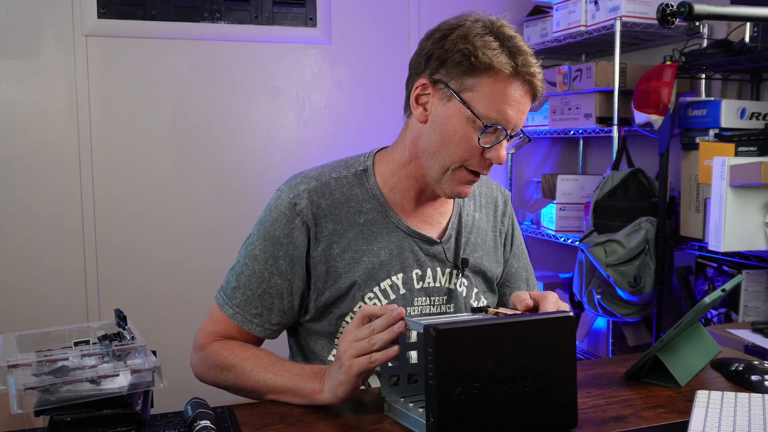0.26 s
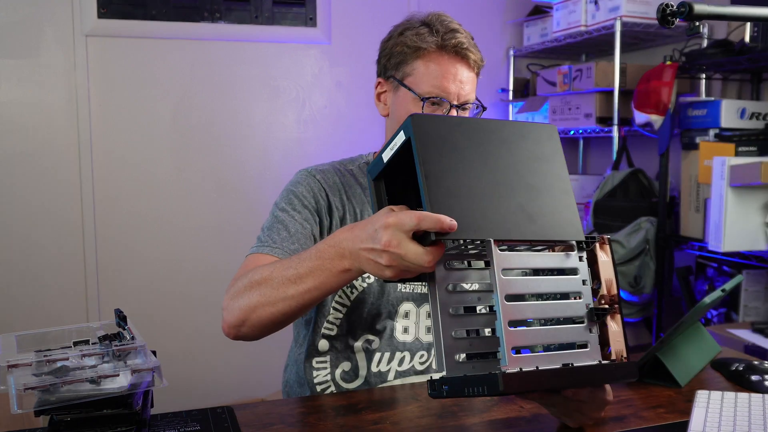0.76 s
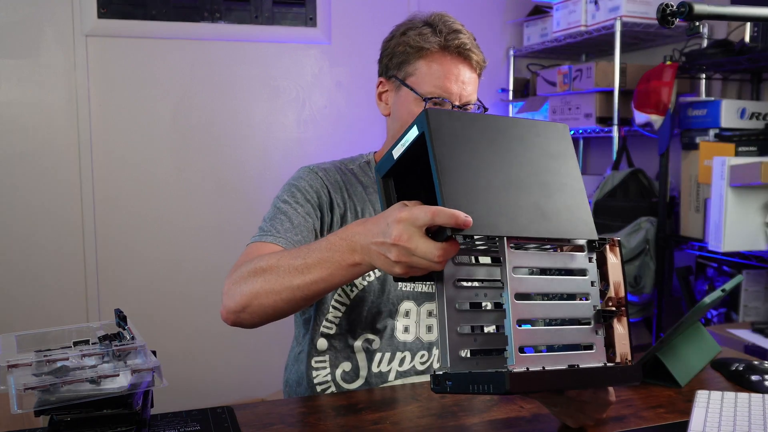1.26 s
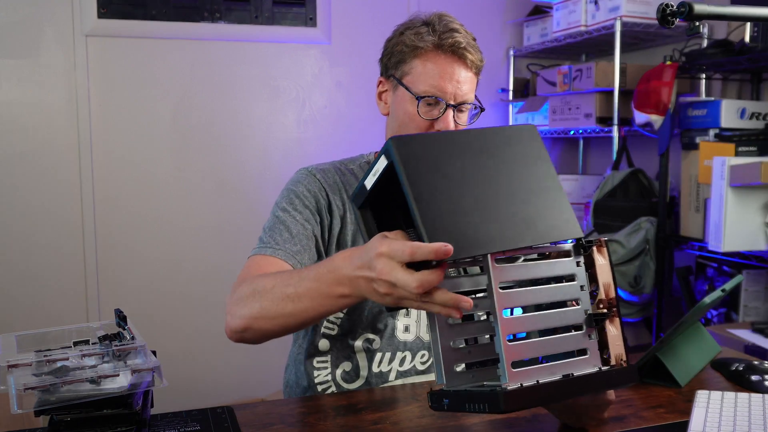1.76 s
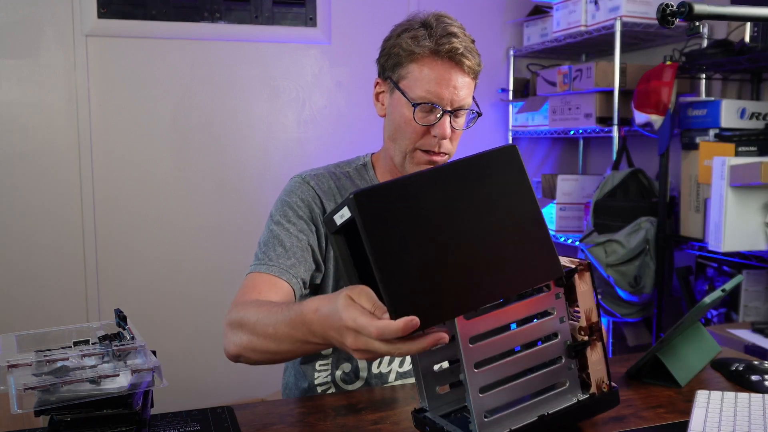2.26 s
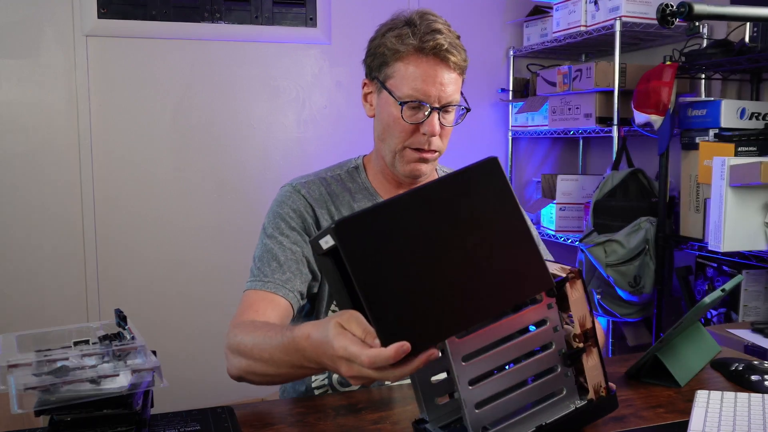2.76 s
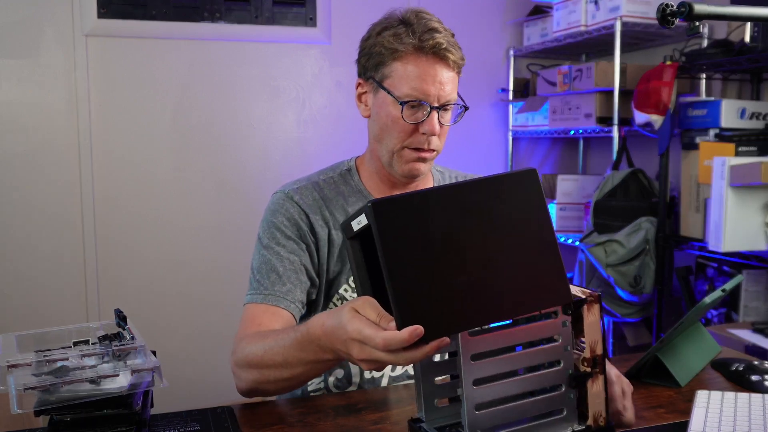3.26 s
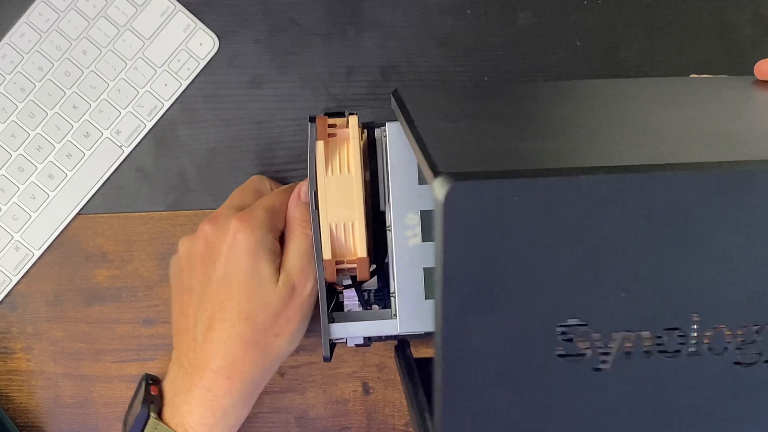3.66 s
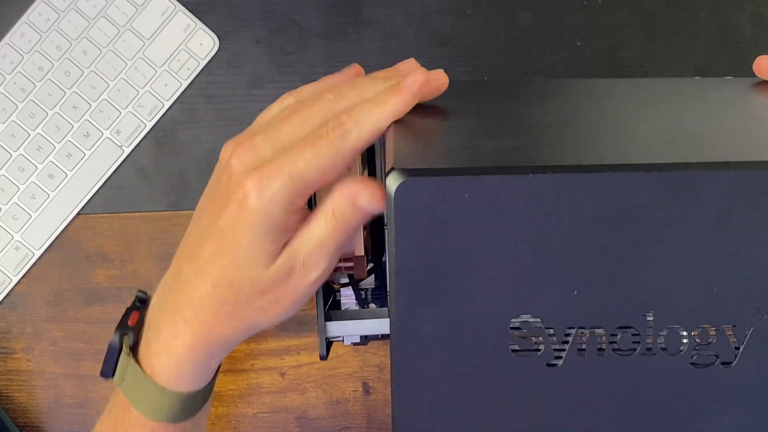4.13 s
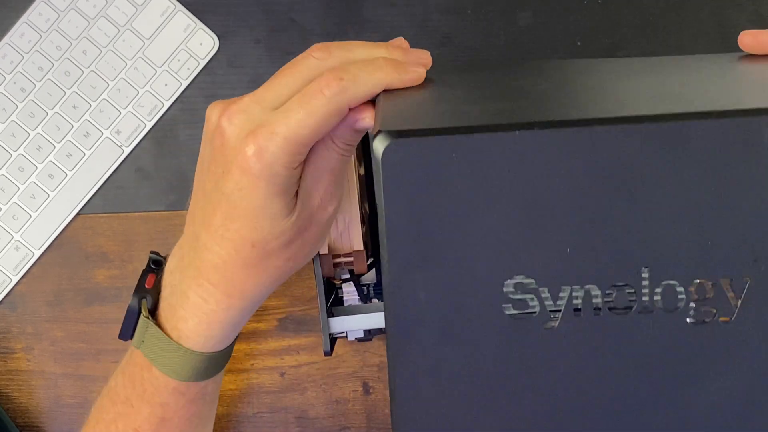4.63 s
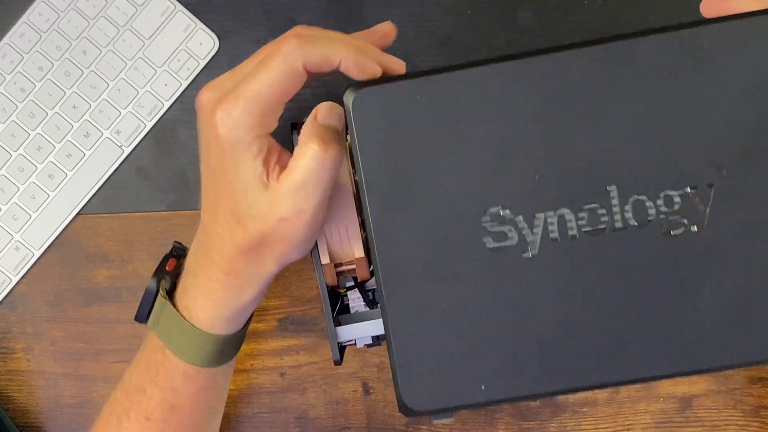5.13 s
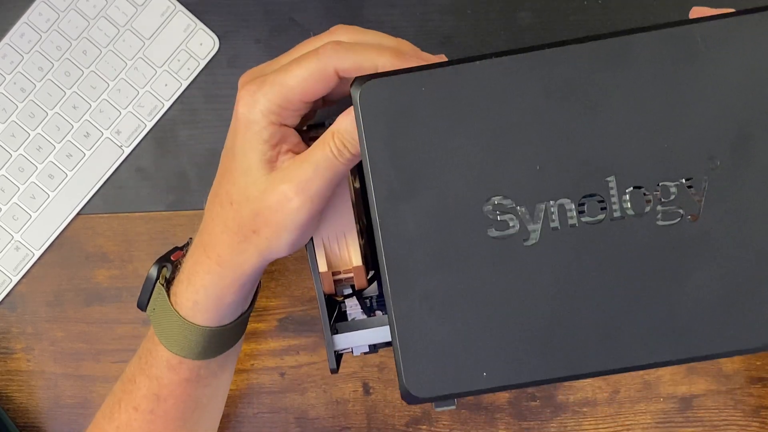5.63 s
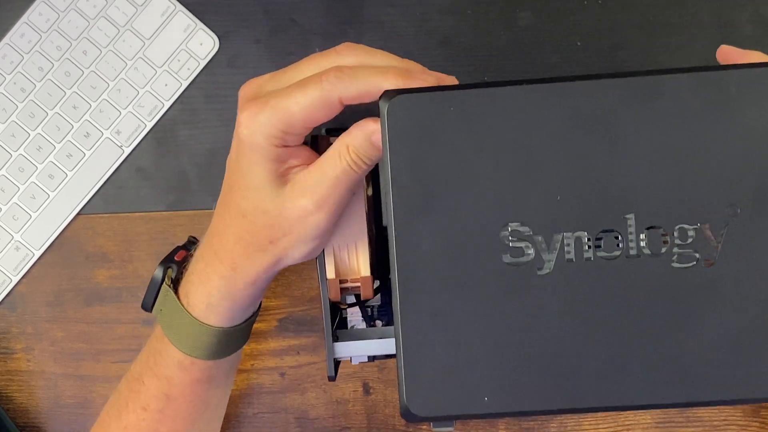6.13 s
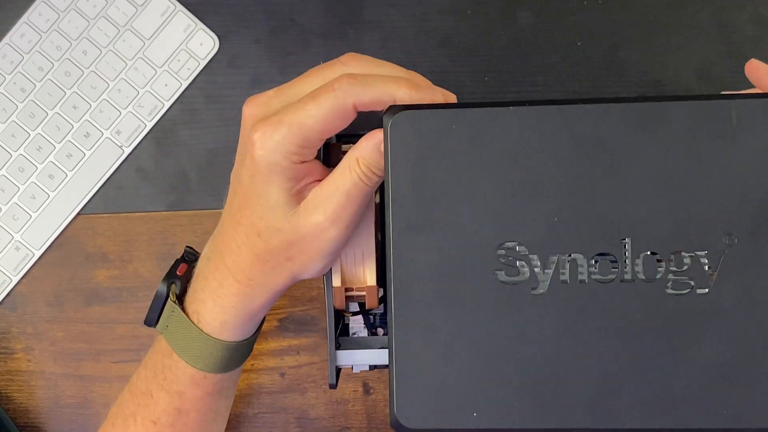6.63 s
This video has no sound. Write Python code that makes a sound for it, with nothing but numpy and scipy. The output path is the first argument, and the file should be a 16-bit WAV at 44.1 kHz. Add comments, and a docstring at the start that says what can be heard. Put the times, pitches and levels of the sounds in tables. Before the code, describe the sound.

A close stereo microphone in a small, quiet room with faint low air noise and short echo. Almost nothing at first, only a light tick and scuff around 0.2 s. At 0.45 s a thin metal cover knocks hard on a frame, cracking and buzzing, with rattles and dry snaps until about 1.1 s, then weaker taps to 1.4 s. A brief scrape comes at 1.6 s. From 1.7 to 3.3 s it is mostly quiet chafing, a very faint high squeak near 2.15 s, a snap and dull desk thump at 2.5 s, and short scrapes around 2.7 to 3.3 s. Sharp clacks hit at 3.43 and 3.65 s. After soft rubbing and a scrape at 4.3 s, bright clattering knocks come at 4.65 to 4.7 s, then a harsh, dense scraping burst with snaps at 4.95 to 5.3 s. Small scuffs and ticks trail off to 6.9 s.

```python
"""On a wooden desk in a small room, a sheet-metal cover is worked onto the frame of a small device.
First its edge knocks and rattles on top of the frame, and the frame is dragged round on the desk;
then the cover is pushed along its rails, scraping, catching and chattering in bursts.
Each knock is a crack and a dying buzz, each scrape is a run of tiny random catches; both set the metal ringing.
Short snaps, stray light ticks and one faint squeak join in, over the quiet air of the room."""
import sys
import numpy as np
from scipy import signal
from scipy.fft import rfft, irfft, next_fast_len
from scipy.io import wavfile

SR = 44100
rng = np.random.default_rng(int(sys.argv[2]) if len(sys.argv) > 2 else 0)


def pcm_store(signal):
    """Save signal as 16-bit PCM."""
    levels = np.round(np.clip(np.atleast_2d(signal), -1, 1) * 32767)
    wavfile.write(sys.argv[1], SR, levels.astype(np.int16).T)


N = 304103   # length in samples
CUTOFF_HZ = 15700   # top of the sound
ON_DESK_S, SEATED_S = 1.7, 3.4   # when the frame is tipped on the desk, and when the cover meets its rails


def from_db(db):
    """Turn decibels into a factor."""
    return 10 ** (np.asarray(db) / 20)


def rms(x):
    """Average strength of a sound."""
    return np.sqrt(np.mean(x ** 2) + 1e-24)


def at_hz(points, hz):
    """Read a table between its points, on a log-frequency axis."""
    points = np.array(points)
    return np.interp(np.log(np.maximum(hz, 1)), np.log(points[:, 0]), points[:, 1])


def band(x, low, high, order=3):
    """Keep only the sound between two frequencies."""
    return signal.sosfilt(signal.butter(order, [low, high], "band", fs=SR, output="sos"), x)


def dying(t, t60):
    """Fade that drops by 60 dB in t60 seconds."""
    return np.exp(-np.log(1000) * t / max(t60, 1e-3))


def add(out, s, sound):
    """Mix a sound in at time s."""
    start = max(round(s * SR), 0)
    out[start:start + len(sound)] += sound[:N - start]


def wander(per_s, t):
    """Random curve around 0, with a typical size of 1, that heads for a new value per_s times a second."""
    knots = rng.standard_normal(len(t))
    return np.interp(t * per_s, np.arange(len(knots)), knots)


def coloured(x, spectrum, size=4096):
    """Filter with the given spectrum, answering as early as it can (causal, minimum-phase)."""
    level_db = at_hz(spectrum, np.arange(size // 2 + 1) * SR / size)
    cepstrum = irfft(np.log(from_db(level_db)))
    # folding the later half onto the earlier one makes the filter minimum-phase
    cepstrum[1:size // 2] *= 2
    cepstrum[size // 2 + 1:] = 0
    response = irfft(np.exp(rfft(cepstrum)))
    return signal.fftconvolve(x, response)[:len(x)]


# colour of the still room: pitch_hz, level_db (per Hz, relative)
AIR_COLOUR = [(15, -43), (25, -10.5), (206, -7), (242, 1.5), (277, -18.5), (416, -1.5), (531, -22),
              (1400, -17), (1700, -18), (3250, -31), (16000, -35)]
AIR_DB = -72


def still_air():
    """The quiet room is steady noise with a fixed colour."""
    air = coloured(rng.standard_normal(N), AIR_COLOUR)
    return from_db(AIR_DB) * air / rms(air)


# how long the room's echo takes to fall by 60 dB: pitch_hz, t60_s
ROOM_T60 = [(80, 1), (300, 0.19), (1000, 0.51), (3000, 0.21), (7000, 0.15), (14000, 0.15)]


def room(x, wet_db, gap_s=0.0066):
    """A diffuse tail fades at its own pace in each band; the channels differ more towards the treble."""
    t = np.arange(int(.7 * SR)) / SR
    edges = np.geomspace(90, 16000, 10)
    echo = 0
    for low, high in zip(edges, edges[1:]):
        hz = np.sqrt(low * high)
        mid, side = band(rng.standard_normal((2, len(t))), low, high, order=2)
        build_up = 1 - np.exp(-(t / gap_s) ** 2)
        fade = dying(t, at_hz(ROOM_T60, hz)) * build_up
        width = min((hz / 9000) ** 2, 1)
        stereo = mid + width * side * np.array([[1], [-1]])
        echo = echo + stereo * fade / np.sqrt(np.sum(fade ** 2) * (1 + width ** 2))
    return from_db(wet_db) * signal.fftconvolve(x[None], echo, axes=1)[:, :N]


def sideways(x, above_hz=4400, side_db=-8.0):
    """Short waves leave the shaking sheet differently to left and right from moment to moment."""
    side = band(x * wander(740, np.arange(N) / SR), above_hz, CUTOFF_HZ, order=2)
    return from_db(side_db) * side * np.array([[1], [-1]])


# ringing tones (modes) of the cover held loose above the frame: pitch_hz, level_db (relative), t60_s
LOOSE_MODES = [(174.5, 9.5, 0.22), (325, 11.5, 0.18), (336, 0.5, 0.17), (410, -22, 0.29), (520.5, -9, 0.32),
               (528, 7.5, 0.72), (1382, 2, 0.053), (1315, 2.5, 0.024), (1500, 8.5, 0.15),
               (1930, -4.5, 0.26), (2084, 7, 0.032), (2650, 4, 0.103), (2860, 6.5, 0.051), (3470, 1, 0.077),
               (4680, -10, 0.13), (4950, 2, 0.041)]
# modes of the frame tilted and dragged on the desk: pitch_hz, level_db (relative), t60_s
FRAME_MODES = [(131.3, -4, 0.5), (214.3, 5, 0.44), (430, 7.5, 0.12), (602, -26, 0.29), (716, 8.5, 0.24),
               (1155, 14, 0.013), (1273, 15, 0.048), (1560, 13, 0.039), (2270, 8, 0.0057),
               (4100, -7, 0.076)]
# modes of the cover once it sits on the rails: pitch_hz, level_db (relative), t60_s
SEATED_MODES = [(76.5, 7, 0.62), (209.3, 5.9, 0.4), (237, 0.7, 0.37), (315, 2.4, 0.24), (435.7, 4.3, 0.057),
                (468, 2.6, 0.08), (527.6, 4.8, 0.031), (571, 4, 0.032), (644, 4.2, 0.033),
                (704, 7.6, 0.083), (952, 6.2, 0.053), (1041, 4.8, 0.056), (1335, 7.7, 0.11),
                (1538, 1.8, 0.086), (1542, 6.2, 0.25), (1691, 2.8, 0.069), (2510, 4.1, 0.056),
                (2860, 3.1, 0.027), (2853, 3.2, 0.067), (3370, 4, 0.25), (5220, 4.2, 0.034),
                (5770, 5.8, 0.08)]
# colour of blows on the loose cover: pitch_hz, level_db (per Hz, relative)
LOOSE_COLOUR = [(50, -35), (100, -19), (165, -8.5), (240, -10), (350, -4.5), (520, 3.5), (680, -7),
                (900, -15), (1350, -6.5), (2100, -10), (3400, -15.5), (4300, -22.5), (7000, -33.5),
                (11000, -40), (15500, -50)]
# colour of blows of the cover against the frame: pitch_hz, level_db (per Hz, relative)
BLOW_COLOUR = [(35, -16.5), (75, -11.5), (130, -7), (210, -5), (290, -5), (480, 4.5), (680, -2.5),
               (850, -8.5), (1500, -2.5), (2300, -5.5), (3250, -5.5), (4100, -15), (8000, -22.5),
               (11000, -30.5), (15500, -38)]


def body_at(s):
    """The modes and the colour of blows depend on how the parts are held: loose, tilted on the desk, seated."""
    if s < ON_DESK_S:
        return LOOSE_MODES, LOOSE_COLOUR
    return FRAME_MODES if s < SEATED_S else SEATED_MODES, BLOW_COLOUR


def ringing_metal(x, modes, ring_db):
    """The metal passes each vibration on and rings with it at its own modes."""
    out = x.copy()
    for hz, db, t60 in modes:
        r = dying(1 / SR, t60)   # what is left of the ring after one sample
        poles = [1, -2 * r * np.cos(2 * np.pi * hz / SR), r * r]
        zeros = [(1 - r * r) / 2, 0, (r * r - 1) / 2]
        out += from_db(db + ring_db) * signal.lfilter(zeros, poles, x)
    return out


def unevenness(spread_db, step_hz=170):
    """Every point of contact favours its own share of the sheet's crowded upper modes (Hz, dB)."""
    hz = np.arange(30, SR / 2, step_hz)
    level_db = spread_db * rng.standard_normal(len(hz)) * np.minimum(hz / 1100, 1)
    return np.column_stack([hz, level_db])


def travelling(force, t, spot_s=0.069):
    """As the point of contact moves on, one uneven colour fades into the next."""
    out = 0
    for s in np.arange(0, t[-1] + spot_s, spot_s):
        nearness = np.sqrt(np.maximum(1 - np.abs(t - s) / spot_s, 0))
        out = out + coloured(force * nearness, unevenness(3.0))
    return out


# four bands, for thump, panel, clang or rasp, tick or hiss: low_hz, high_hz
ZONES = [(35, 250), (250, 900), (900, 4000), (4000, 15800)]
# colour of the force between sliding parts: pitch_hz, level_db (per Hz, relative)
RUB_COLOUR = [(24, -24), (40, -11), (215, -8.5), (276, -6.5), (585, -5), (831, -11.5), (1090, -12.5),
              (1210, -17.5), (1520, -12.5), (4800, -20), (11600, -35.5), (14500, -39.5), (16000, -62)]
# share of each band in friction, desk rumble first: level_db at hardness 0, change_db per dB of hardness
RUB_SHARES = [(-12, 0.17), (0, -0.52), (-4, 0.68), (-15.5, 1.0)]


def friction(s, t, hardness_db, grain_db, judder_db, ring_db):
    """Tiny catches of the rubbing edges, in uneven clumps, drive the metal; the desk rumbles along."""
    grain = from_db(grain_db * np.minimum(rng.exponential(1, len(t)), 5))
    judder = from_db(judder_db * wander(150, t))
    catches = rng.standard_normal(len(t)) * grain * judder
    force = travelling(coloured(catches, RUB_COLOUR), t)
    modes, _ = body_at(s)
    rub = ringing_metal(force, modes, ring_db)
    out = 0
    for (low, high), (db, slope) in zip(ZONES, RUB_SHARES):
        part = band(rub, low, high)
        out = out + from_db(db + slope * hardness_db) * part / rms(part)
    return out


# faint chafing while the hands hold cover and frame together: time_s, level_db (before the trim below)
CHAFE = [(0, -82), (.43, -86), (.55, -56), (.97, -53.5), (1.25, -60), (1.52, -70), (1.8, -65),
         (2.03, -66.5), (2.42, -76.5), (2.7, -63.5), (3.7, -58), (4.0, -67.5), (4.5, -62), (4.72, -46.5),
         (4.9, -60), (5.25, -38.5), (5.42, -66.5), (6.3, -62), (6.74, -74), (6.9, -59.5)]
CHAFE_TRIM_DB, CHAFE_HARDNESS_DB = 0.5, -1.0


def chafing(fidget_db=2.0, fidget_per_s=25):
    """Between the pushes the parts never lie quite still, whether loose, tilted or seated."""
    out = np.zeros(N)
    changes = [0, ON_DESK_S, SEATED_S, N / SR]
    for start, end in zip(changes, changes[1:]):
        t = np.arange(int((end - start) * SR)) / SR
        held_db = CHAFE_TRIM_DB + np.interp(start + t, *np.transpose(CHAFE))
        level_db = held_db + fidget_db * wander(fidget_per_s, t)
        rub = friction(start, t, CHAFE_HARDNESS_DB, grain_db=3.5, judder_db=3.0, ring_db=-9.5)
        add(out, start, from_db(level_db) * rub)
    return out


RING_DB = -4.5   # ring of the metal after a blow
KNOCK_RISE_S = 0.0009   # the sheet takes this long to start buzzing
# a harder contact moves the sound from panel to clang and tick: (dB at hardness 0, dB per dB of hardness)
KNOCK_PANEL, KNOCK_CLANG, KNOCK_TICK = (-1.75, -0.28), (-5, 0.34), (-18.5, 1.0)


def blow(s, strength_db, hardness_db, thump_db, t60, thump_trim_db=-4.0,
         linger=(1.1, 1.15, 1.1, 1.1), crack=5.0, buzz_db=1.5):
    """A contact is a crack and a dying buzz of sheet on sheet; hardness sets the share of panel, clang and tick."""
    t = np.arange(SR // 3) / SR
    attack = t < .025   # each band is levelled over these first moments
    modes, colour = body_at(s)
    rise = 1 - np.exp(-t / KNOCK_RISE_S)
    buzz = rng.standard_normal(len(t)) * from_db(buzz_db * wander(903, t)) * rise
    buzz[0] = crack
    force = coloured(coloured(buzz, colour), unevenness(3.8))
    shares = [thump_db + thump_trim_db]
    shares += [db + slope * hardness_db for db, slope in (KNOCK_PANEL, KNOCK_CLANG, KNOCK_TICK)]
    out = 0
    for (low, high), db, stretch in zip(ZONES, shares, linger):
        part = band(ringing_metal(force * dying(t, t60 * stretch), modes, RING_DB), low, high)
        out = out + from_db(strength_db + db) * part / rms(part[attack])
    return out


TICKS_PER_S, TICK_OVER_CHAFE_DB, TICK_HARDNESS_DB = 7, -0.5, 2
TICK_THUMP_DB, TICK_T60_S = -12.0, 0.035   # as in a blow, before its trim and stretch


def ticks(spread_db=4.0):
    """Edges touch lightly at random, harder where the parts chafe more."""
    out = np.zeros(N)
    waits_s = rng.uniform(.2, 1.8, size=120) / TICKS_PER_S
    for s, luck in zip(np.cumsum(waits_s), rng.standard_normal(len(waits_s))):
        if s < N / SR:
            db = np.interp(s, *np.transpose(CHAFE)) + TICK_OVER_CHAFE_DB + spread_db * luck
            add(out, s, blow(s, db, TICK_HARDNESS_DB, TICK_THUMP_DB, TICK_T60_S))
    return out


STROKE_ARCH = 0.75   # loudness is this power of the speed


def arch(t):
    """Loudness of one push: it speeds up and slows down as a half sine."""
    return np.abs(np.sin(np.pi * t / t[-1])) ** STROKE_ARCH


SQUEAK_S, SQUEAK_LENGTH_S = 2.13, 0.123
SQUEAK_HZ, SQUEAK_WIDTH_HZ, SQUEAK_DB = 3890, 160, -69   # level before the arch


def squeak():
    """One edge squeaks faintly as it slides: a narrow, unsteady tone under the arch of a push."""
    out = np.zeros(N)
    t = np.arange(int(SQUEAK_LENGTH_S * SR)) / SR
    low, high = SQUEAK_HZ - SQUEAK_WIDTH_HZ / 2, SQUEAK_HZ + SQUEAK_WIDTH_HZ / 2
    tone = band(rng.standard_normal(len(t)), low, high, order=2)
    add(out, SQUEAK_S, from_db(SQUEAK_DB) * arch(t) * tone / rms(tone))
    return out


# pushes that make an edge slide: start_s, length_s, level_db (before arch and shares), hardness_db
STROKES = [(0.242, .1, -63, 6), (0.54, 0.11, -52, 4.5), (1.58, 0.071, -50, 3.5), (1.921, 0.095, -62, 5.5),
           (2.089, 0.17, -64, 8), (2.698, 0.067, -53, 3.5), (2.759, 0.33, -52, 5), (3.13, 0.079, -62.5, 15),
           (3.191, .14, -47.5, 5.5), (3.414, 0.02, -50, 9), (3.761, 0.14, -69, 15), (4.27, .13, -53, 3.5),
           (4.551, 0.21, -52, 4), (4.82, 0.1, -55.5, -0.5), (4.968, 0.21, -49.5, 16),
           (5.052, 0.021, -42, 14.5), (5.08, 0.17, -39, 4.5), (5.444, 0.037, -57, 2),
           (5.826, 0.21, -74.5, 18), (6.04, .07, -63.5, 2.5), (6.16, 0.067, -53, 2.5),
           (6.248, 0.13, -58, 5), (6.428, 0.088, -52.5, 1.5), (6.61, 0.07, -57, -1),
           (6.797, 0.088, -64.5, 13)]


def strokes():
    """Each push swells and fades as the edge gathers speed and stops."""
    out = np.zeros(N)
    for s, length_s, db, hardness_db in STROKES:
        t = np.arange(int(length_s * SR)) / SR
        rub = friction(s, t, hardness_db, grain_db=3.0, judder_db=2.5, ring_db=-6.5)
        add(out, s, from_db(db) * arch(t) * rub)
    return out


# hard, clean snaps of an edge: start_s, peak_db, pitch_hz (middle of five tones), t60_s
SNAPS = [(0.8035, -19, 2600, .03), (1.004, -23, 430, .02), (1.0312, -16, 440, .015),
         (2.4935, -22, 1500, .014), (3.4292, -14, 3300, .014), (3.959, -42, 1500, .012),
         (4.158, -45, 5000, .012), (5.0745, -17, 3000, .015), (5.2165, -20, 520, .02),
         (6.324, -32, 750, .03)]


def snaps(spread=0.339):
    """An edge that slips off a ledge gives a pulse a few milliseconds long, with its bass cut."""
    out = np.zeros(N)
    t = np.arange(SR // 20) / SR
    for s, db, hz, t60 in SNAPS:
        partials = hz * np.exp(spread * np.linspace(-1, 1, 5))
        tones = sum(np.sin(2 * np.pi * (f * t + rng.random())) for f in partials)
        pulse = band(dying(t, t60) * tones, hz / 2, min(hz * 4, CUTOFF_HZ), order=2)
        add(out, s, from_db(db) * pulse / np.abs(pulse).max())
    return out


# contacts of cover, frame and desk, before the shares, trim and stretch in blow:
# start_s, strength_db, hardness_db, thump_db (of the desk, over the strength), t60_s (of the ring)
KNOCKS = [(0.2277, -53.5, 12.5, -10, 0.041), (0.454, -27.5, -3, -9.5, 0.13),
          (0.4565, -25.5, 2.5, -20, 0.16), (0.4987, -30, -8, -5, 0.055), (0.5075, -29.5, 2, -31, 0.099),
          (0.5393, -33.5, -4.5, -28.5, 0.03), (0.5686, -36, 1.5, -23.5, 0.043),
          (0.685, -40.5, -2, -32, 0.058), (0.7715, -36.5, -1.5, -5, 0.073), (0.8032, -27.5, 7.5, -21, 0.13),
          (0.8818, -42, -1, -30, 0.057), (0.9451, -44.5, 4.5, -27, 0.066), (1.0029, -33, -11, -5, .1),
          (1.0087, -33.5, 8, -12, 0.11), (1.0304, -35.5, 2.5, -15, 0.12), (1.08, -36.5, -1, -13, 0.046),
          (1.1543, -48, -4, -19, .13), (1.32, -41, 4, -10.5, 0.16), (1.383, -40, 4, -19, 0.14),
          (1.6051, -50.5, 4, -12, 0.12), (1.8045, -51.5, 4, -2, 0.038), (2.4924, -37.5, -6, 5, 0.06),
          (2.5204, -45, -6.5, 6, 0.3), (2.9396, -52.5, -22, 10.5, .2), (2.9729, -42.5, 2.5, -20, .07),
          (3.267, -55.5, -10, 10.5, 0.2), (3.3441, -54, -5, 8.5, 0.087), (3.4268, -30, 5, 3, 0.08),
          (3.4407, -27.5, 0, 3.5, .19), (3.4613, -33.5, -0.5, -6, .22), (3.639, -28.5, -3.5, -3.5, .12),
          (3.65, -25.5, 2.5, -30, 0.092), (3.6821, -24, -0.5, -15, 0.066), (3.6903, -29.5, 5, -37, 0.11),
          (4.0539, -53.5, -1, -4.5, 0.045), (4.4649, -49, -13.5, -1.5, 0.047), (4.5407, -46, -2, -9, .14),
          (4.6505, -25.5, 6, -19, 0.094), (4.6743, -29.5, -0.5, -17, 0.17), (4.7, -24.5, 4.5, -8, 0.085),
          (4.8054, -50, 2, -9, 0.058), (4.91, -44.5, -6, -10, 0.059), (4.9358, -33.5, -1, -19, 0.19),
          (4.9864, -40, 3.5, -13, 0.37), (5.073, -27, 15.5, -18, 0.18), (5.0903, -29.5, -17, -6.5, 0.12),
          (5.108, -28, -4, -19, 0.051), (5.1681, -35, 3, 0, 0.053), (5.1999, -42, 12, 4, 0.041),
          (5.2153, -41, -22, 6, .11), (5.2412, -32.5, 8, -10, 0.051), (5.2522, -35.5, -28.5, -17, 0.095),
          (5.2707, -40.5, -18, 2, 0.17), (5.5853, -51, -6.5, -6, 0.077), (5.7321, -54.5, -18, 0, 0.12),
          (5.9662, -56.5, 10.5, -30, 0.065), (6.1423, -50, -2, 0, 0.053), (6.195, -43, -6.5, -2.5, 0.15),
          (6.322, -43, -6, -16, 0.044), (6.7654, -64, -31, -18, 0.059)]


def knocks():
    """The cover strikes the frame, and the frame the desk."""
    out = np.zeros(N)
    for s, strength_db, hardness_db, thump_db, t60 in KNOCKS:
        add(out, s, blow(s, strength_db, hardness_db, thump_db, t60))
    return out


def scene():
    """Friction, snaps and knocks close to the microphone, over the still room."""
    handling = chafing() + ticks() + squeak() + strokes() + snaps() + knocks()
    return still_air() + room(handling, wet_db=-13.5) + handling + sideways(handling)


# how far the microphone's right port lags its left: pitch_hz, lag_radians
PORT_PHASE = [(0, 0), (1300, .09), (2400, .2), (4400, .42), (6900, .7), (9100, 1.05), (13400, 1.75),
              (15500, 2.4)]


def record(dry):
    """The right port of the microphone lags by about a sample at most; the top is cut."""
    size = next_fast_len(N + 64)
    spectrum = rfft(dry[1], size)
    hz = np.arange(len(spectrum)) * SR / size
    lag = np.interp(hz, *np.transpose(PORT_PHASE))
    right = irfft(spectrum * np.exp(-1j * lag), size)[:N]
    top_cut = signal.ellip(10, .1, 80, CUTOFF_HZ, fs=SR, output="sos")
    return signal.sosfilt(top_cut, np.array([dry[0], right]))


dry = scene()
out = record(dry)
pcm_store(out)
```